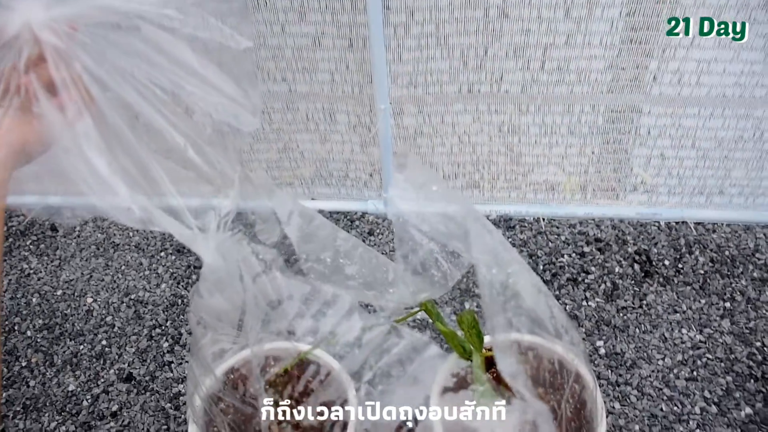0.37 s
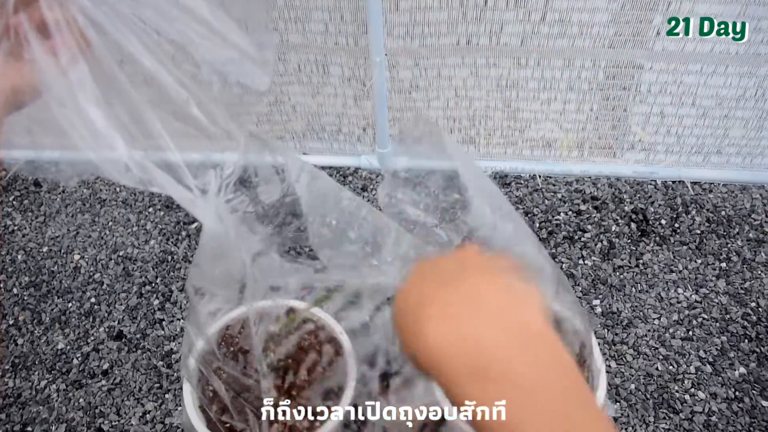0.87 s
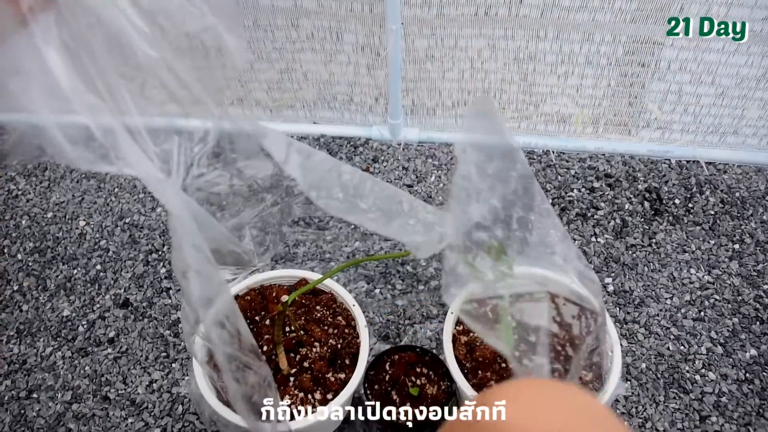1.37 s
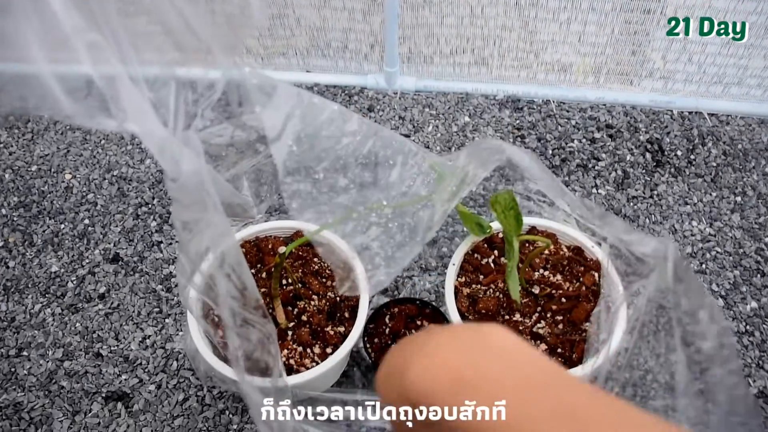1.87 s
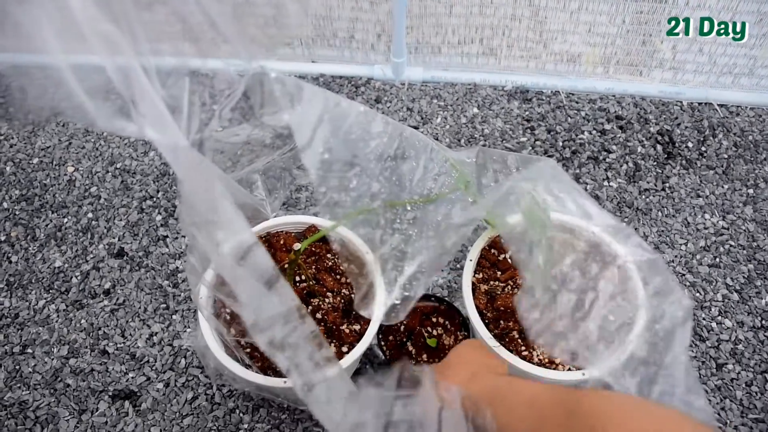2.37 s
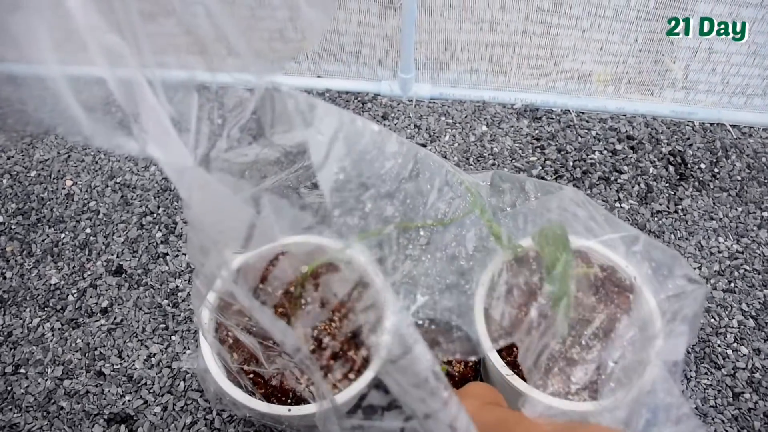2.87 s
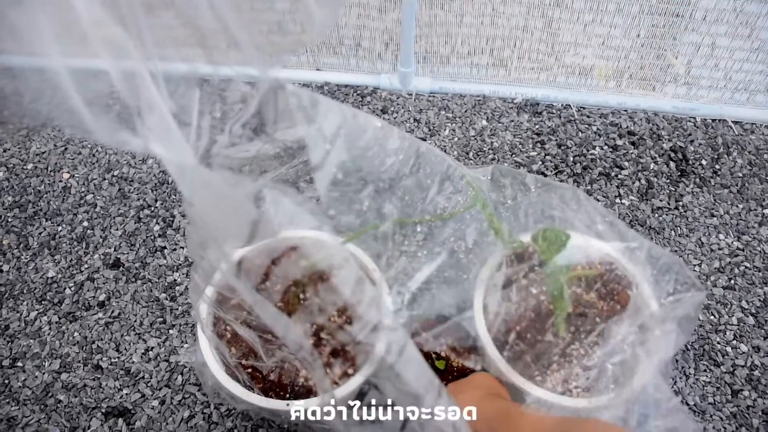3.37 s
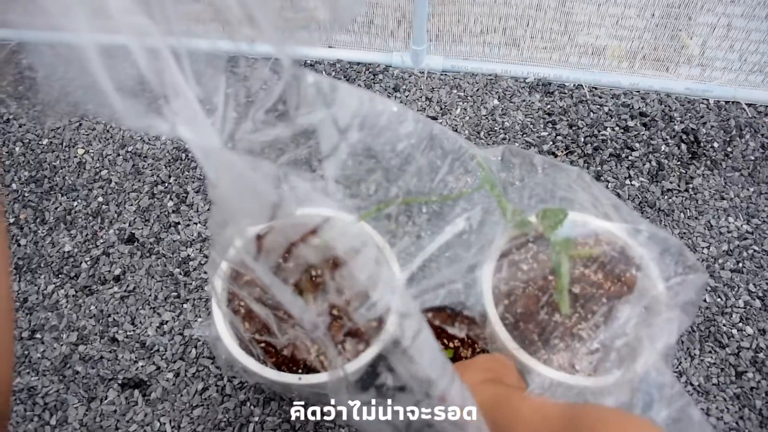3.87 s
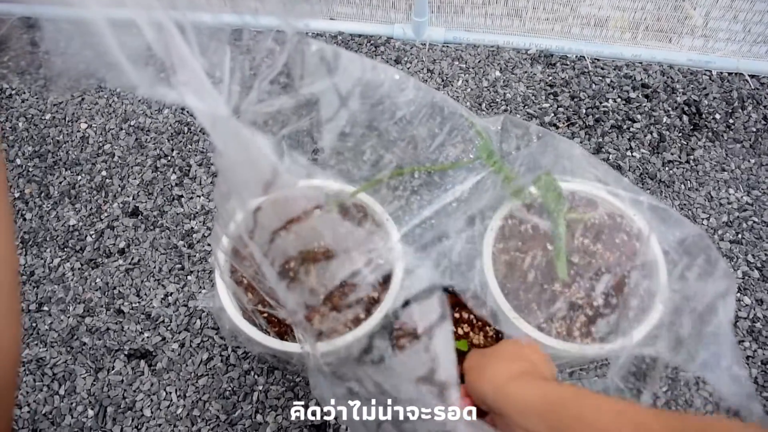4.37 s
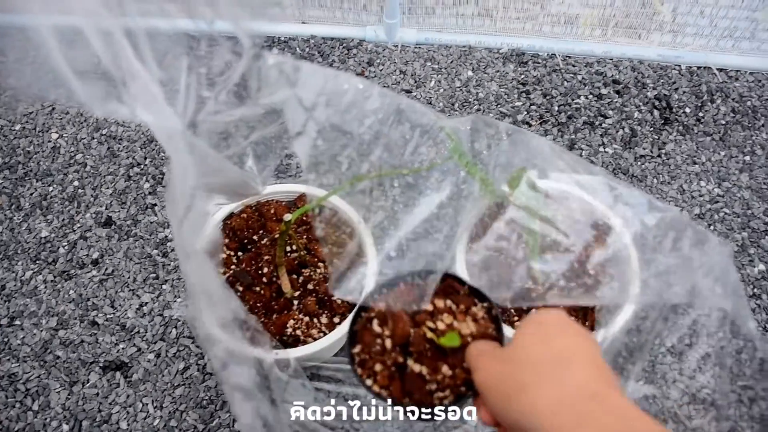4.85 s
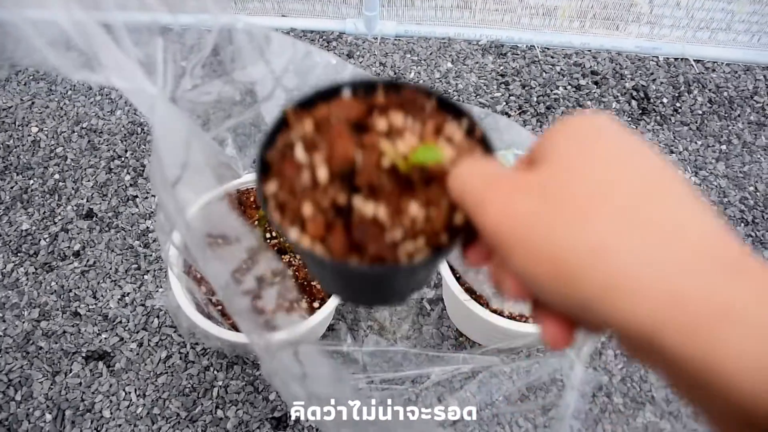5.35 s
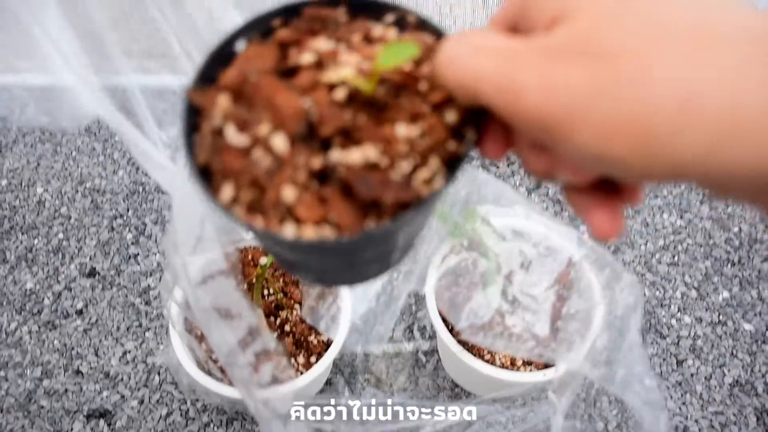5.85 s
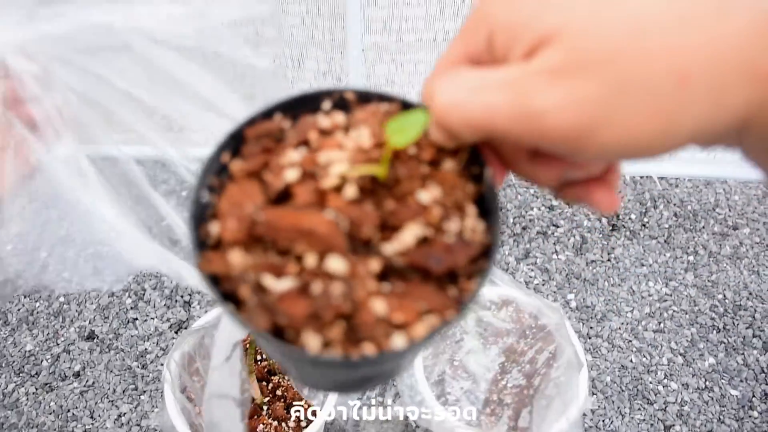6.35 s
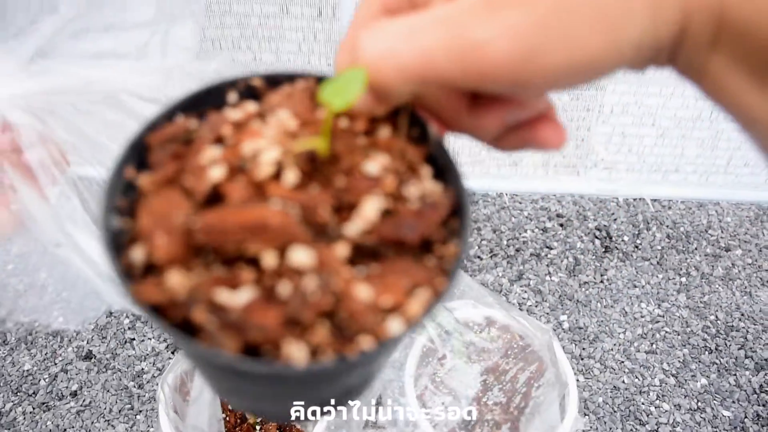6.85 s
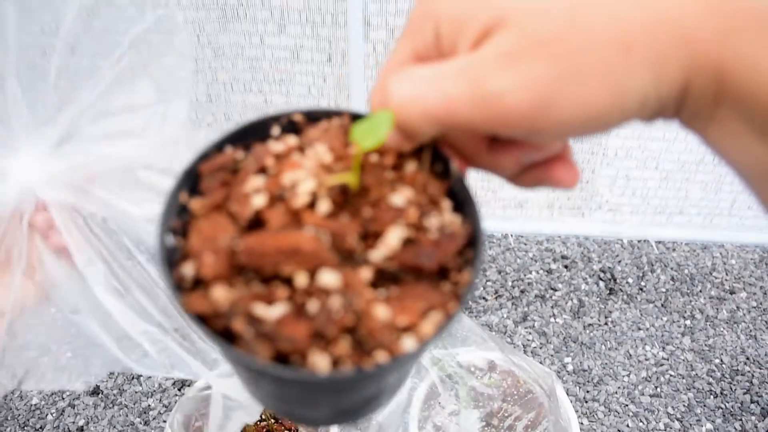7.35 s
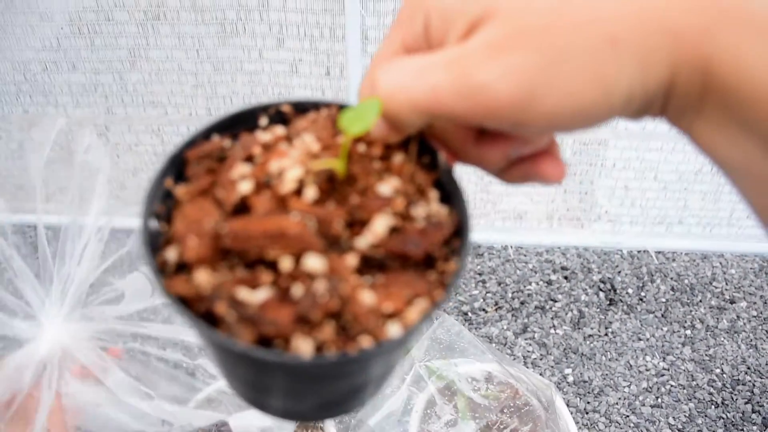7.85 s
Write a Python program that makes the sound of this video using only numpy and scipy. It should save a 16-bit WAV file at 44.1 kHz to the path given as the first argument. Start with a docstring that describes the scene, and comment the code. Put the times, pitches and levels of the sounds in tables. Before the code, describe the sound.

Outdoors in a wood, a stereo pair picks up quiet, wide air hiss with a slowly varying low rumble. A very close sparrow chirps brightly and roughly at 0, 1.0 and 1.8 seconds, each chirp a quick rise and broken fall. Around it, farther birds give thin high whistles, falling notes and a slowing trill at 1.2-1.7, mostly to the right, with echoes among trunks. From 2.2 to 3.3 a central warbler swells through pure whistles and buzzes into chatter, then a churr. Short whistles and sinking notes follow until 4.7, then zigzag chirps to 5.3 and rapid ticking slurs to 5.9. A swoop, a looping note and a quivering fall end by 6.4. It grows sparse, with faint distant murmurs, until the warbler repeats its phrase from 7.35 to the end near 8.2. Faint hoarse dove coos recur between 1.2 and 6.4.

```python
"""Dawn chorus in a wood

Small birds around a pair of microphones. Noise shaped in frequency makes a slowly swelling hiss.
A dove's arching sines coo softly; further birds are gliding, trembling sines, mostly to the right,
echoing among trunks as fading noise responses. A warbler whistles, buzzes and churrs in the centre.
Close by, a sparrow chirps three times with two beating voices, their overtones and breath noise."""
import sys
import numpy as np
from scipy import signal
from scipy.fft import rfft, irfft
from scipy.io import wavfile
from scipy.ndimage import uniform_filter1d

SR = 44100
rng = np.random.default_rng(int(sys.argv[2]) if len(sys.argv) > 2 else 0)


def invert_db(level):
    """Linear amplitude ratio for a level in decibels (20 dB per decade), elementwise."""
    return 10 ** (np.asarray(level, dtype=float) / 20)


def bounce(signal):
    """Save signal as a 16-bit WAV file at the path given by the first command-line argument."""
    frames = np.transpose(np.atleast_2d(signal))
    limited = np.clip(frames, -1, 1)
    pcm = np.round(limited * 32767).astype(np.int16)
    wavfile.write(sys.argv[1], SR, pcm)


N = 362502
T = np.arange(N) / SR


def slow(rate_hz, size):
    """Smooth chance that changes rate_hz times a second."""
    return np.interp(np.arange(size) * rate_hz / SR, np.arange(2000), rng.standard_normal(2000))


def pair(likeness, size):
    """Left and right noise with a given correlation, from a common and an opposed part."""
    c = np.clip(likeness, -1, 1)
    mid, side = rng.standard_normal((2, size))
    opposed = side * np.array([[1], [-1]])
    return (np.sqrt(1 + c) * mid + np.sqrt(1 - c) * opposed) / np.sqrt(2)


def band(lo_hz, hi_hz, size):
    """Noise between two frequencies, rms 1."""
    sos = signal.butter(2, [lo_hz, hi_hz], "band", fs=SR, output="sos")
    x = signal.sosfilt(sos, rng.standard_normal(size))
    return x / np.std(x)


def decay(t60_s):
    """Exponential fade, 60 dB in t60_s."""
    return np.exp(-np.log(1000) * T[:SR] / t60_s)


def echo(x, fade, likeness):
    """Scatter off trunks and leaves: a fading noise response of unit energy."""
    tail = pair(likeness, len(fade)) * fade
    return signal.fftconvolve(x[None], tail / np.sqrt(np.sum(fade ** 2)), axes=1)[:, :N]


def add(track, start_s, sound):
    """Mix a sound in, cut at both ends of the track."""
    i = int(start_s * SR)
    sound, i = sound[max(-i, 0):], max(i, 0)
    track[i:i + len(sound)] += sound[:max(N - i, 0)]


def edges(size, fade_s=.003):
    """Soft start and end of a note."""
    i = np.arange(size)
    return np.clip(np.minimum(i, size - i) / (fade_s * SR), 0, 1)


PLAIN = (0, 0, 0, 0, 0)
# 2nd and 3rd partial of a whistled note: level/dB against the first
OVERTONE_DB = (-41, -43)


def note(shape, pitch, length=1, voicing=PLAIN, saw=False, widen=False):
    """A sine with faint overtones follows a shape, with vibrato and throb; steady rms near 1 at 0 dB."""
    s, hz, db = np.transpose(shape)
    t = np.arange(int(s[-1] * length * SR)) / SR
    vibrato_hz, swing_hz, throb_hz, depth, bursts = voicing
    turn = vibrato_hz * t
    wobble = 1 - 2 * (turn % 1) if saw else np.cos(2 * np.pi * turn)
    if widen:
        wobble = wobble * t / t[-1]
    freq = pitch * np.interp(t, s * length, hz) + swing_hz * wobble
    throb_turn = np.cumsum(throb_hz * (1 + 0.3 * slow(60, len(t)))) / SR  # uneven rate
    throb = 1 - depth * np.cos(np.pi * throb_turn) ** 2
    if bursts:
        throb = throb * np.clip(1.8 * np.sin(np.pi * (bursts * t / t[-1] % 1)) - .25, 0, 1)
    phase = 2 * np.pi * (np.cumsum(freq) / SR + rng.random())
    tone = np.sin(phase)
    for k, overtone_db in enumerate(OVERTONE_DB, 2):
        tone = tone + invert_db(overtone_db) * (k * freq < SR / 2.5) * np.sin(k * phase)
    level = np.sqrt(2) * invert_db(np.interp(t, s * length, db))
    return level * throb * edges(len(t)) * tone


# spectrum of the hiss before levelling: (f/Hz, relative level per Hz/dB)
HISS = [(12, -29), (20, 0.5), (49, -2), (404, -12.5), (767, -13), (1410, -17.5), (1920, -16.5),
        (3080, -14.5), (6720, -34), (7310, -19.5), (8170, -33.5), (13900, -25), (15500, -44.5)]
HISS_LIKENESS = -0.4  # left-right correlation
# swell: (t/s, level between 100 and 1400 Hz before the rumble/dB, change of the rumble/dB)
HISS_SWELL = [(0.0, -67, -9), (0.18, -73.5, 0), (1.92, -71.5, -3), (2.579, -76, 0.6), (5.45, -76.5, 2.1),
              (5.61, -75, -1.1), (6.3, -76.5, 1.1), (6.64, -72.5, 3), (8.22, -74, 3)]


def hiss():
    """Air and microphone noise, partly opposed left and right, swelling slowly under a varying rumble."""
    f = np.maximum(np.fft.rfftfreq(N, 1 / SR), 1)
    hz, db = np.transpose(HISS)
    gain = invert_db(np.interp(np.log(f), np.log(hz), db))
    middle = gain[(f > 100) & (f < 1400)]
    gain = gain / np.sqrt(np.sum(middle ** 2) / len(f))
    s, level_db, rumble_db = np.transpose(HISS_SWELL)
    air = rfft(pair(HISS_LIKENESS, N)) * gain
    rumble = irfft(air / (1 + (f / 120) ** 4), N)
    rumble_change = invert_db(np.interp(T, s, rumble_db)) - 1
    return invert_db(np.interp(T, s, level_db)) * (irfft(air, N) + rumble_change * rumble)


# birds too far to tell apart, each glide scattered about this: (t/s, level/dB)
CHORUS = [(0, -51.5), (.3, -84), (1.01, -81), (1.14, -94), (2.04, -82.5), (2.5, -63.5), (2.79, -62.5),
          (3.36, -61), (3.78, -63.5), (4.35, -63.5), (6.11, -75), (6.66, -76.5), (7.49, -71.5),
          (7.92, -61.5), (8.22, -59.5)]
CHORUS_HZ, CHORUS_SPREAD = 4100, .24  # central pitch; spread as a natural logarithm


def chorus(count=2500):
    """Countless brief, steep sine glides, sent to the wood to be heard only as a haze of echo."""
    out = np.zeros(N)
    s, level_db = np.transpose(CHORUS)
    draws = np.c_[rng.random((count, 2)), rng.standard_normal((count, 3))]
    for when, long, high, glide, size in draws:
        start = when * N / SR
        ends = np.clip([high - .6 * glide, high + .6 * glide], -3, 2.2)
        hz = CHORUS_HZ * np.exp(CHORUS_SPREAD * ends)
        sweep = np.linspace(*hz, int((.008 + .02 * long) * SR))
        tone = np.hanning(len(sweep)) * np.sin(2 * np.pi * np.cumsum(sweep) / SR)
        add(out, start, tone * invert_db(np.interp(start, s, level_db) + 3.8 * size))
    return out


# coos, pitches before the dove's pitch factor and waver:
# (start t/s, length t/s, top f/Hz, depth of the arch f/Hz, level/dB)
DOVE = [(1.17, 0.49, 544.5, 79.3, -78.5), (1.88, 0.137, 481, 70, -74), (2.47, 0.22, 490, 35, -75.5),
        (2.78, 0.29, 488, 34.8, -76), (3.47, 0.26, 613, 136.4, -79.5), (3.92, 0.67, 591, 128.4, -83.5),
        (4.69, .39, 532, 111, -79.5), (5.38, 0.2, 476, 30, -77), (5.69, 0.26, 486, 35, -75),
        (6.26, 0.094, 469, 40, -74)]
DOVE_PITCH, DOVE_WAVER, DOVE_ROUGH = 0.98, .02, .5  # factor; chance shares of pitch and loudness
DOVE_LAG_S = 0.00058  # the right microphone hears it later
COO_TOP, COO_FADE_DB = 0.253, -2.5  # share of the length before the top; fade across the coo


def dove():
    """Soft, slightly hoarse coos from one side: the pitch arches up quickly and sags slowly."""
    out, u = np.zeros(N), np.linspace(0, 1, num=13)
    away = np.where(u < COO_TOP, 1 - u / COO_TOP, (u - COO_TOP) / (1 - COO_TOP))
    for start, length_s, top_hz, depth_hz, db in DOVE:
        waver = 1 + DOVE_WAVER * rng.standard_normal(len(u))
        hz = (top_hz - depth_hz * away ** 2) * waver
        sound = note(np.c_[u * length_s, hz, db + COO_FADE_DB * u ** 2], DOVE_PITCH)
        rough = 1 + DOVE_ROUGH * slow(40, len(sound))
        add(out, start, sound * edges(len(sound), 0.014) * rough)
    return np.array([out, np.roll(out, int(DOVE_LAG_S * SR))])


WHISTLE_ATTACK_S, WHISTLE_ONSET_DB = 0.013, -7.5
WHISTLE_PAN_DB, WHISTLE_ECHO_DB = -2.5, -3.5  # left minus right; send to the wood


def whistle(first_hz, turn_s, turn_hz, length_s, last_hz, fade_db):
    """Shape of a plain whistle: quick attack, one turn of pitch, even fade."""
    s = np.sort([0, min(WHISTLE_ATTACK_S, length_s / 2), turn_s, length_s])
    hz = np.interp(s, [0, turn_s, length_s], [first_hz, turn_hz, last_hz])
    db = fade_db * s / length_s + WHISTLE_ONSET_DB * (s == 0)
    return np.c_[s, hz, db], WHISTLE_PAN_DB, WHISTLE_ECHO_DB


# plain whistles, a glide with one turn: (start t/s, level/dB, first f/Hz, turn after t/s, turn f/Hz,
# length t/s, last f/Hz, fade level/dB)
WHISTLES = [(0.032, -69.5, 8500, 0.092, 8550, 0.29, 8540, -17),
            (0.278, -48, 6250, 0.046, 5620, 0.092, 5545, -5), (.39, -73, 2500, 0.07, 2485, 0.48, 2450, -14),
            (0.458, -45.5, 6400, 0.011, 7870, 0.044, 6330, -5),
            (.797, -46.5, 6490, 0.066, 7610, 0.11, 8070, -4.5),
            (.967, -51, 5800, 0.02, 5450, 0.039, 4450, -9),
            (2.307, -46.5, 6847, 0.02, 8070, .18, 7230, -4.5),
            (2.621, -47, 5860, 0.052, 5540, 0.095, 4070, -7),
            (3.272, -44, 5580, 0.022, 6620, .05, 5820, -6),
            (3.398, -59, 3520, 0.055, 4000, 0.098, 3886, 0.5),
            (3.538, -51, 8500, 0.062, 7520, 0.1, 6850, 2),
            (3.695, -49.5, 7060, .085, 7240, .11, 6660, -1.3), (3.82, -50, 7090, .12, 7245, 0.15, 6720, -1),
            (4.007, -51, 5290, 0.047, 4740, .13, 4605, -8.5),
            (4.689, -44, 7400, 0.031, 6380, 0.079, 6270, -7),
            (6.059, -66, 7800, 0.02, 6600, 0.035, 5600, 16),
            (6.429, -74.5, 3350, 0.046, 3930, 0.13, 3640, -1.1),
            (7.428, -72.5, 6220, 0.077, 6020, 0.24, 6300, -.3)]


def whistles():
    """Plain glides of the further birds, as rows of the score."""
    return [("whistle", whistle(*rest), start, db, 1, 1) for start, db, *rest in WHISTLES]


# note of a bird, before each note's own level, pitch and length:
# name: (rows of (t/s, f/Hz, level/dB), left minus right level/dB, echo level/dB)
SHAPES = { "drop": ([(0, 6200, -19), (.008, 5200, 6.5), (.022, 4280, 2.5), (.052, 3533, -0.5)], -4, -0.5),
          "sink": ([(0, 5650, -6), (.012, 5250, 3.5), (.035, 4146, 4), (.055, 3650, -3), (.07, 3500, -9.5)],
          -3.5, -2), "arch": ([(0, 6760, -5), (.008, 6870, -1), (.028, 6570, 0.5), (.045, 5874, 2),
          (.058, 4950, -3.5), (.07, 3790, -7.5)], -3, -0.9), "hook": ([(0, 5520, -10), (.012, 6600, -1),
          (.04, 7050, -4), (.055, 6800, -1), (.088, 3730, -7.5)], -3.5, 1.5), "pure": ([(0, 3455, -20),
          (.015, 3407, -8), (.03, 3378, .6), (.09, 3345, 0.3), (.1, 3250, -9.5)], .8, -19.5),
          "buzz": ([(0, 3520, -4), (.008, 3540, 11.5), (.018, 3580, 2.5), (.028, 3850, -6)], 1.5, -13),
          "chatter": ([(0, 4855, -4.5), (.07, 4990, -2.5), (.143, 5050, -0.9)], .2, -11),
          "churr": ([(0, 2868, -21), (.02, 2883, 2), (.15, 2823, -1.1), (.2, 2790, -4), (.225, 2658, -12)],
          .1, -20), "low": ([(0, 1638, -8.5), (.05, 1950, 0.5), (.11, 2044, 1.5), (.2, 1826, 0.5),
          (.3, 1775, -1.5), (.45, 1564, -11)], .4, -13.5), "mew": ([(0, 1490, -5), (.06, 1820, -1.1),
          (.16, 1730, -4), (.28, 1554, -7)], -.3, -6), "murmur": ([(0, 1857, -6.5), (.1, 2030, 4),
          (.25, 2020, -2), (.4, 1930, -6)], -3.2, .55), "flat": ([(0, 5140, 4.5), (.02, 5300, 0),
          (.06, 5170, -8.5), (.1, 5230, -4)], -3.5, -1.5), "vee": ([(0, 4850, 2), (.008, 3987, 2.5),
          (.015, 2974, -15), (.022, 3397, -17), (.028, 4770, 14), (.034, 6440, 0)], -4.5, -4),
          "slur": ([(0, 3644, -1.5), (.012, 3207, 2.5), (.03, 2460, -4.5)], -6, -5.5),
          "tick": ([(0, 3840, 2), (.004, 4240, 2.5), (.008, 4740, 6)], -8, -2.1), "swoop": ([(0, 3004, 1.5),
          (.015, 2752, -4.5), (.035, 2924, -2), (.07, 3230, 6), (.1, 4000, -3.5)], -8.5, -5),
          "loop": ([(0, 3370, -3), (.009, 5360, 2), (.018, 3955, 1.5), (.022, 4550, -2), (.027, 3010, -4),
          (.036, 3600, 4.5), (.055, 2860, -4), (.12, 2126, -11)], -8, .1), "cut": ([(0, 6810, -2),
          (.015, 5950, 0.5), (.035, 5480, 3)], -3.5, -4), "cap": ([(0, 5700, -5), (.008, 7600, 4),
          (.03, 7600, -3), (.055, 7300, -1)], -3, -5), "rattle": ([(0, 6700, 9), (.004, 5900, 4.5),
          (.008, 4700, -3)], -3, -4), "spike": ([(0, 4960, -2.1), (.005, 6000, 1.1), (.01, 6800, -9)],
          -2.5, .6), "quiver": ([(0, 7400, -8), (.008, 8670, -7), (.04, 7900, 1.5), (.075, 6780, -0.5)],
          -2.1, -2.5)}
# calls by name: (start t/s, level/dB, pitch factor)
NOTES = { "drop": [(.183, -64, .95), (.539, -58, 1.02), (.702, -57, 1.03)], "sink": [(4.167, -55, 1.03),
         (4.303, -56, .99), (4.441, -55.5, .99), (4.578, -57.5, 1.02)], "arch": [(1.166, -52, 1.01),
         (1.915, -51, 1.02)], "hook": [(2.029, -49, 1.001), (2.163, -50.5, .99)],
         "chatter": [(3.278, -52, .99)], "churr": [(3.455, -60.5, .985)], "murmur": [(3.95, -76.5, 1.04),
         (4.4, -76, .95), (4.85, -75.5, 1.15), (6.45, -78.5, .95), (7.02, -77.5, 1.45)],
         "flat": [(.638, -56.5, 1.016), (4.119, -57, 1.03), (4.252, -57.5, .99), (4.396, -59.5, 1.02)],
         "cut": [(4.208, -67, 1.1), (4.385, -63, 1.01), (4.558, -60, 1.04), (8.003, -65, 1.03),
         (8.181, -59.5, 0.98)], "cap": [(4.325, -73, 1.04), (4.503, -69.5, 1.025), (7.945, -71.5, 1.02),
         (8.125, -72, 1.03)], "spike": [(3.681, -56.5, 1.001), (3.845, -57, 1.001)],
         "mew": [(3.484, -75.5, 1.001)], "swoop": [(5.895, -51, 1.001)], "loop": [(6.092, -52, 1.001)],
         "quiver": [(6.282, -61, 1.001)], "low": [(2.486, -76, 1.001), (7.614, -73.5, 1.001)]}


def calls():
    """Calls with their own times, alone or in short runs, each a shape moved in pitch and level."""
    return [(name, SHAPES[name], *row, 1) for name, notes in NOTES.items() for row in notes]


# trills, levels before chance scatter:
# (note, first t/s, gap t/s, each gap longer by t/s, first level/dB, last level/dB)
TRILLS = [("arch", 1.283, .1175, .003, -50.5, -51), ("rattle", 2.79, 0.032, 0, -66, -64),
          ("vee", 4.668, .105, .0014, -58, -53.5), ("tick", 5.316, .0708, 0, -56, -56.5),
          ("slur", 5.324, .0706, 0, -51, -51)]
# notes in each trill (count)
TRILL_NOTES = (4, 16, 6, 9, 8)
TRILL_SCATTER_DB, TRILL_SCATTER_PITCH = 1.2, .008  # chance in level; chance share of pitch


def trills():
    """One shape repeated at even or slowing gaps, with small chance in level and pitch."""
    rows = []
    for (name, first_s, gap_s, slower_s, first_db, last_db), count in zip(TRILLS, TRILL_NOTES):
        for k, (loud, high) in enumerate(rng.standard_normal((count, 2))):
            start = first_s + k * gap_s + slower_s * k * (k - 1) / 2
            db = first_db + (last_db - first_db) * k / (count - 1) + TRILL_SCATTER_DB * loud
            rows.append((name, SHAPES[name], start, db, 1 + TRILL_SCATTER_PITCH * high, 1))
    return rows


# the song swells through whistles and buzzes to a chatter and a churr:
# (note, t/s from the song's start, level/dB before the song's own, length factor)
SONG = [("pure", 0, -66, 0.83), ("buzz", 0.11, -71.5, 1.9), ("pure", .181, -53, 0.78),
        ("buzz", .310, -61, 1.2), ("pure", 0.346, -43.5, 0.94), ("buzz", .477, -53.5, 0.96),
        ("pure", .510, -40.5, 1), ("chatter", .632, -46, .99), ("churr", .800, -52.5, 1.001)]
# when it is sung: (start t/s, level/dB added)
SONGS = [(2.228, -1.33), (7.348, 1.2)]


def warbler():
    """The warbler in the centre sings its row of notes at each start."""
    return [(name, SHAPES[name], start + s, db + song_db, 1, length)
            for start, song_db in SONGS for name, s, db, length in SONG]


# zigzag that ends each vee: (t/s, f/Hz before the pitch factor, level/dB against the note)
ZIGZAG = [(0, 5320, 3.5), (.02, 5240, -6.5), (.035, 4800, -14), (.05, 4510, -18)]
ZIGZAG_AFTER_S = .034
# notes that are not plain glides: name: (vibrato rate f/Hz, vibrato swing f/Hz,
# mean throb rate f/Hz, throb depth 0-1, bursts in a note)
VOICING = {"buzz": (190, 150, 200, .9, 0), "chatter": (250, 190, 175, .9, 5),
           "quiver": (80, 600, 80, .3, 0), "zigzag": (115, 1300, 115, .4, 0), "churr": (60, 20, 60, .4, 0),
           "murmur": (23, 70, 30, .8, 0)}
# upper voice of the churr: (pitch ratio, saw rate f/Hz, saw swing f/Hz, level/dB)
CHURR_UPPER = (1.11, 60, 86, 2.2)


def churr_upper(shape, pitch):
    """The other side of the syrinx saws downward above the steady tone."""
    ratio, rate_hz, swing_hz, upper_db = CHURR_UPPER
    voicing = (rate_hz, swing_hz, rate_hz, .7, 0)
    return invert_db(upper_db) * note(shape, pitch * ratio, voicing=voicing, saw=True)


LAG_S_PER_DB = -.00002  # delay of the left microphone per dB of pan
FAR_BELOW_DB, FAR_FLUTTER, FAR_SHADE_DB = -66, .6, -5  # half far at this level; flutter; direct loss


def songbirds():
    """Place every note by level and arrival time at two microphones, and send it into the wood."""
    direct, send = np.zeros((2, N)), np.zeros(N)
    score = calls() + trills() + warbler() + whistles()
    for name, (shape, pan_db, echo_db), start, db, pitch, length in score:
        voicing = VOICING.get(name, PLAIN)
        # the quiver's vibrato widens as it falls
        parts = [(start, note(shape, pitch, length, voicing, widen=name == "quiver"))]
        if name == "vee":
            parts.append((start + ZIGZAG_AFTER_S, note(ZIGZAG, pitch, voicing=VOICING["zigzag"])))
        if name == "churr":
            parts.append((start, churr_upper(shape, pitch)))
        # faint whistles and murmurs are behind leaves: fluttering, mostly echo
        far = np.clip((FAR_BELOW_DB - db) / 10 + .5, 0, 1) * (name in ("whistle", "murmur"))
        for s, sound in parts:
            sound = sound * (1 + FAR_FLUTTER * far * slow(70, len(sound)))
            add(send, s, sound * invert_db(db + echo_db))
            sound = sound * invert_db(FAR_SHADE_DB * far)
            add(direct[0], s + pan_db * LAG_S_PER_DB, sound * invert_db(db + pan_db / 2))
            add(direct[1], s, sound * invert_db(db - pan_db / 2))
    return direct, send


WOOD_T60_S, WOOD_LATE_T60_S, WOOD_LATE_DB = 0.53, 1.34, -16.5
WOOD_PAN_DB, WOOD_LIKENESS = -2.5, -0.35  # left minus right; left-right correlation


def wood(send):
    """Echo among trunks, a quick fade over a fainter slow one, stronger on the right."""
    fade = decay(WOOD_T60_S) + invert_db(WOOD_LATE_DB) * decay(WOOD_LATE_T60_S)
    return echo(send, fade, WOOD_LIKENESS) * invert_db(np.array([[WOOD_PAN_DB], [-WOOD_PAN_DB]]) / 2)


# the near chirp, before each chirp's own level and length: (t/s, base f/Hz, level/dB,
# 2nd partial level/dB against it, 3rd partial level/dB against it, second voice level/dB against the first)
CHIRP = [(0, 2652, -69.5, 24, 13, -7), (.010, 2800, -54.5, 22, -6, -8), (.017, 3030, -50.5, 23.5, -1, -12),
         (.029, 3230, -44, 17, 1.5, -14), (.042, 3710, -38, 4, -4, -11),
         (.049, 4410, -27, -9.5, -10.5, -8.5), (0.054, 5210, -23.5, -17, -21, -8),
         (.064, 5710, -30, -13, -35, -13.5), (.072, 4580, -30, -18.5, -19.5, -31),
         (.080, 4150, -29, -15, -20.5, -28), (.087, 4000, -29.5, -14, -19.5, -23),
         (.093, 3286, -47.5, -2, -6, -20.5), (0.101, 3116, -50.5, -11, -7.5, -2),
         (.106, 3670, -36, -15.5, -20, 1), (.118, 3856, -24.5, -19.5, -33, -5),
         (.124, 4400, -28.5, -23, -32, -5.5), (.128, 4735, -33, -12.5, -33, -2.5),
         (.132, 3888, -30, -19.5, -32.5, -7.5), (.138, 3440, -32.5, -13, -31.5, 1),
         (.145, 3486, -37, -16, -33.5, -6.5), (.150, 2447, -56, -4.5, -22.5, -6),
         (.155, 3177, -36, -23, -38, -7), (0.16, 3520, -45.5, -13, -36.5, -6)]
# the second voice steps from part to part of the chirp: (from t/s, mean offset f/Hz)
SECOND_VOICE = [(0, 251), (.046, -600), (.068, 295.5), (0.096, 350.5), (.130, 402)]
CHIRP_FALL_S = 0.074  # from here, in the fall after the peak, the chirp's length factor applies
# (start t/s, level/dB added, length factor in and after the fall)
CHIRPS = [(-.042, 0.4, 0.97), (1.037, -0.5, 0.97), (1.785, 0.66, .97)]
SPARROW_BREATH_DB, SPARROW_FOURTH_DB = -19.5, 2.5  # breath against the tone; 4th partial against the 3rd
SPARROW_ECHO_DB, SPARROW_T60_S, SPARROW_ECHO_HZ = -10, 0.2, 6000  # short echo, dulled above this
LEAD_IN_S, LEAD_IN_DB, LEAD_IN_HZ = 0.042, -36, (4800, 8000)  # hoarse air before the voice catches


def sparrow():
    """Two voices beat; overtones are powers of their sum, so each carries sidebands; breath hisses along."""
    out = np.zeros(N)
    s, *columns = np.transpose(CHIRP)
    step_s, step_hz = np.transpose(SECOND_VOICE)
    for start, call_db, length in CHIRPS:
        t = np.arange(0, CHIRP_FALL_S + (s[-1] - CHIRP_FALL_S) * length, 1 / SR)
        t = np.where(t < CHIRP_FALL_S, t, CHIRP_FALL_S + (t - CHIRP_FALL_S) / length)
        hz, db, second_db, third_db, voice_db = (np.interp(t, s, c) for c in columns)
        db = db + call_db
        gap_hz = step_hz[np.searchsorted(step_s, t, "right") - 1]
        gap_hz = uniform_filter1d(gap_hz, int(.004 * SR))
        shaky_hz = hz * (1 + 0.0089 * slow(500, len(t)))
        first_hz = shaky_hz - gap_hz / 2 * np.minimum(invert_db(voice_db), 1)
        phase = 2 * np.pi * np.cumsum(first_hz) / SR
        apart = 2 * np.pi * np.cumsum(gap_hz * (1 + .15 * slow(150, len(t)))) / SR
        both = (1 + invert_db(voice_db) * np.exp(1j * apart)) * np.exp(1j * phase)
        both = both / np.sqrt(1 + invert_db(2 * voice_db))
        levels = [db, db + second_db, db + third_db, db + third_db + SPARROW_FOURTH_DB]
        tone = np.zeros(len(t))
        for k, level_db in enumerate(levels, 1):
            # powers of two beating voices peak harder, hence the root
            tone += invert_db(level_db) * (k * hz < SR / 2.5) * np.imag(both ** k) / np.sqrt(k)
        loud = np.hypot(invert_db(levels[0]), invert_db(levels[1]))
        breath = invert_db(SPARROW_BREATH_DB) * loud * band(4500, 20000, len(t))
        add(out, start, (np.sqrt(2) * tone + breath) * edges(len(t), 0.0016))
        size = int(LEAD_IN_S * SR)
        swell = np.linspace(0, 1, size) * edges(size, 0.017)
        add(out, start + s[2] - LEAD_IN_S, invert_db(LEAD_IN_DB) * swell * band(*LEAD_IN_HZ, size))
    dull = signal.sosfilt(signal.butter(2, SPARROW_ECHO_HZ, fs=SR, output="sos"), out)
    return out + invert_db(SPARROW_ECHO_DB) * echo(dull, decay(SPARROW_T60_S), 0.99)


def scene():
    """Hiss, dove, the echo of the wood, direct notes and the near sparrow, summed at the microphones."""
    direct, send = songbirds()
    return hiss() + dove() + wood(send + chorus()) + direct + sparrow()


def low_pass(x):
    """Removes everything above the highest recorded frequency."""
    return signal.sosfilt(signal.butter(12, 15640, fs=SR, output="sos"), x)


def record(dry):
    """A slightly lopsided input stage squares the sound, turning loud beats into faint low thumps."""
    thump = signal.sosfilt(signal.butter(2, 600, fs=SR, output="sos"), dry ** 2)
    mix = dry + 0.31 * thump
    return low_pass(mix)


dry = scene()
out = record(dry)
bounce(out)
```